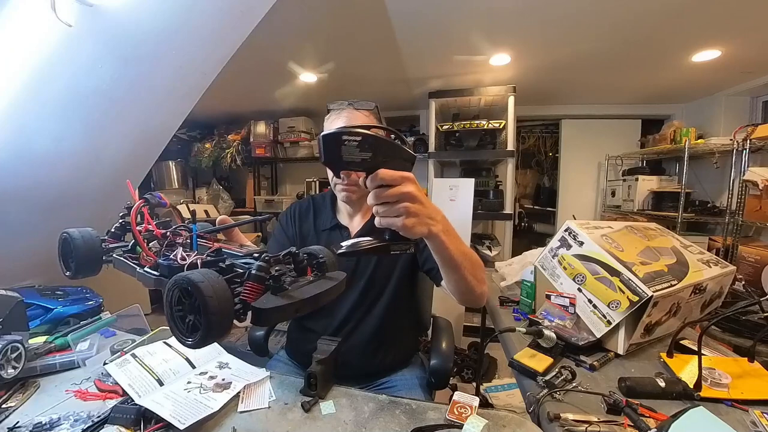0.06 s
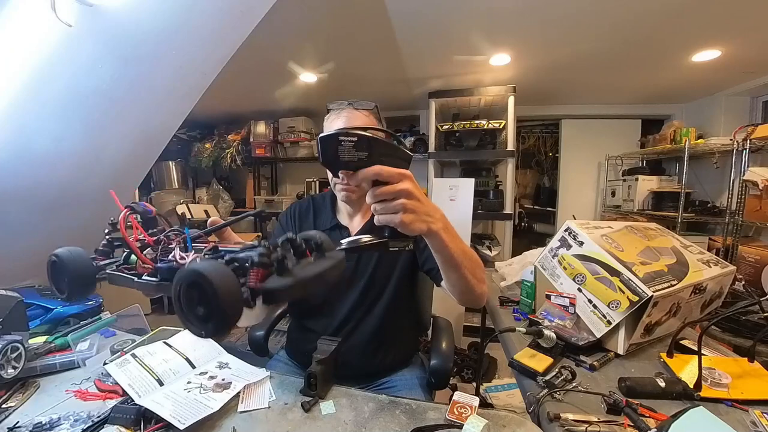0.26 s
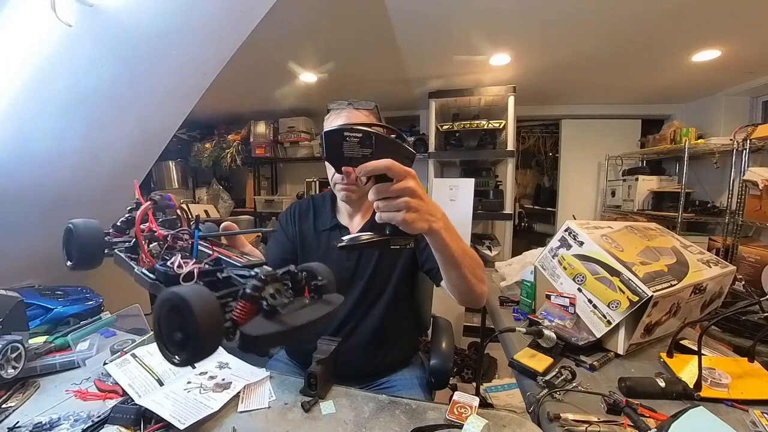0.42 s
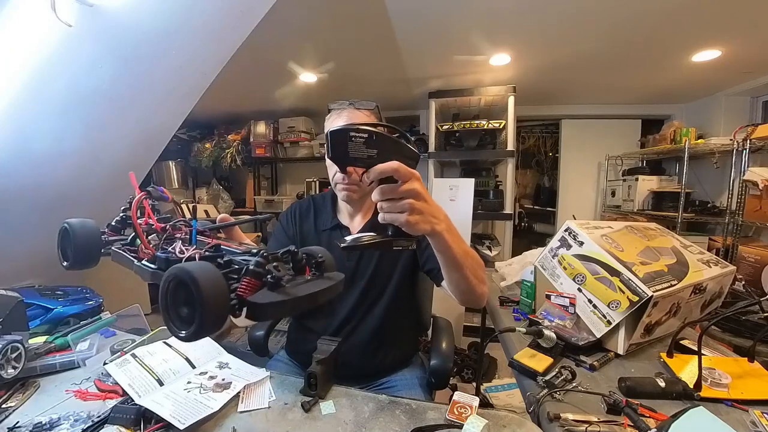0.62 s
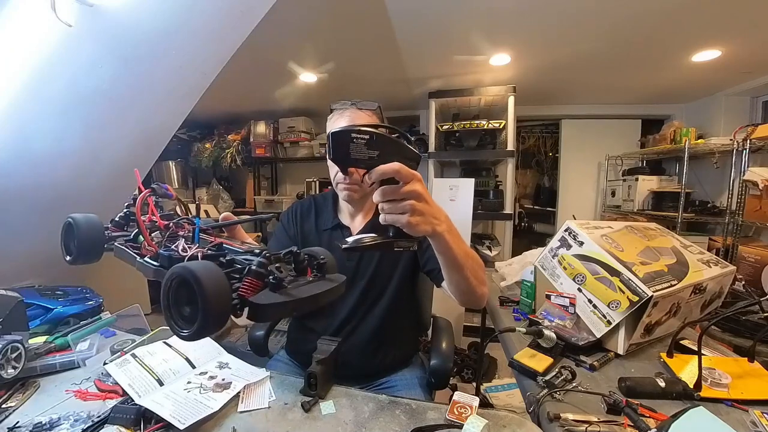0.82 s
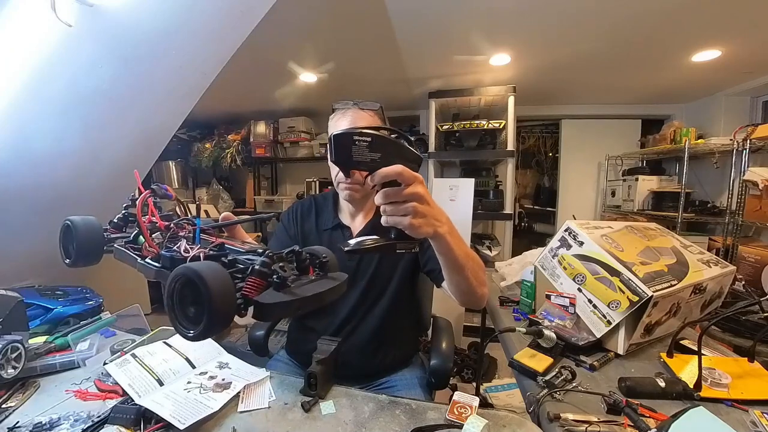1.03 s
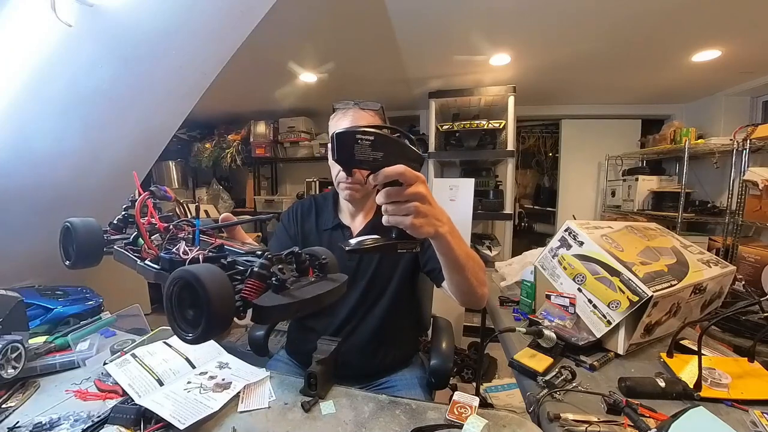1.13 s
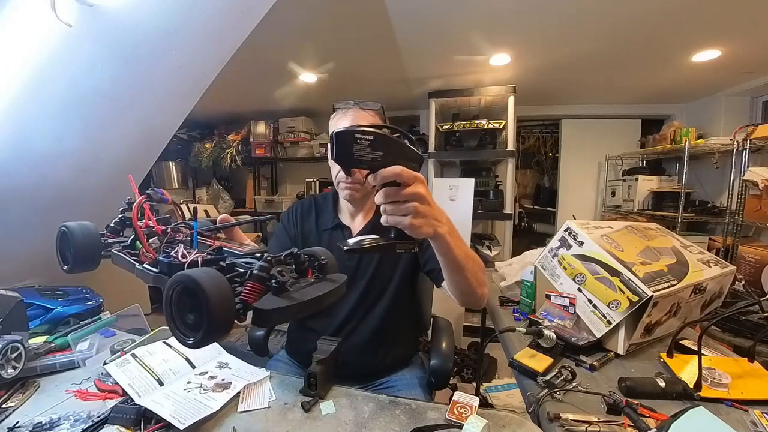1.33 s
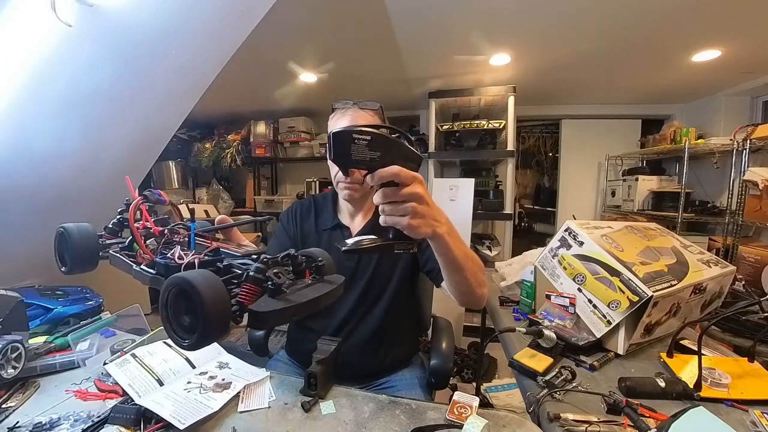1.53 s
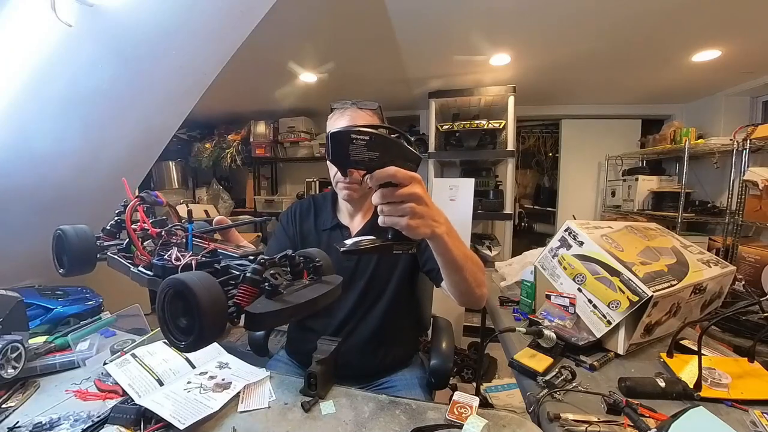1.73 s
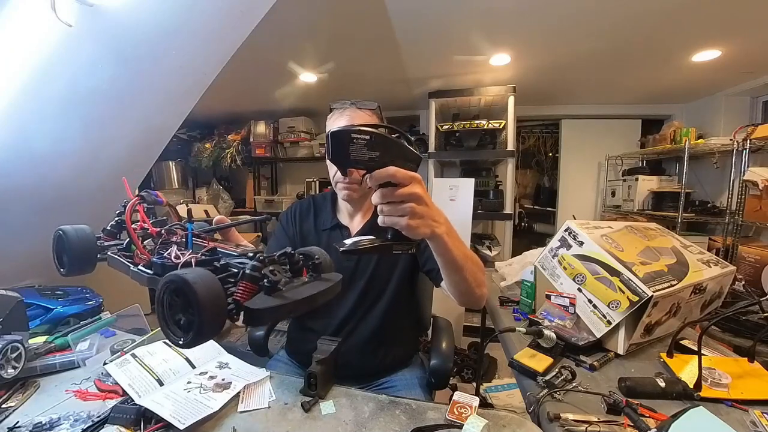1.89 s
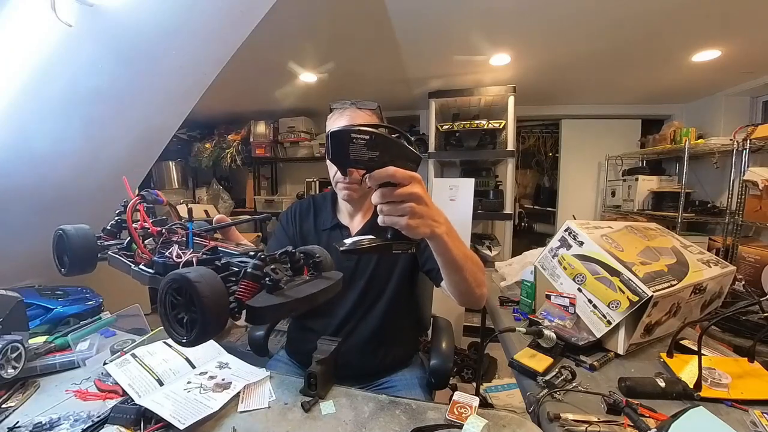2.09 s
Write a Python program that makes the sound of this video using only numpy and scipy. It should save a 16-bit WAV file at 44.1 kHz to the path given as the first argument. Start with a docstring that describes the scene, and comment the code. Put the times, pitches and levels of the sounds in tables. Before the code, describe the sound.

A small electric motor in a model car bites with a knock, screeches, then coasts down rattling

```python
"""In a workshop with low rumble and mains hum, a model car is held in the air while its cooling fan whines.
The electric motor stirs, then kicks in with a knock: random tooth contacts hiss and ring the chassis, the car
shakes and jolts, and rough squeals glide. Then the drivetrain coasts, teeth singing and rattling louder once a
turn of the slightly eccentric axle gear, while a lower grind comes forward; at the halt the slack knocks.
Filtered noise makes hiss, chassis, fan air and room; sines make blade tones, tooth tones, squeals and jolts."""
import sys
import numpy as np
from scipy import signal
from scipy.fft import rfft, irfft, next_fast_len
from scipy.io import wavfile
from scipy.ndimage import uniform_filter1d, map_coordinates

SR = 44100
rng = np.random.default_rng(int(sys.argv[2]) if len(sys.argv) > 2 else 0)


def to_wav(s):
    """Save 16-bit WAV."""
    ch = np.atleast_2d(s).T  # columns
    pcm = np.round(np.clip(ch, -1, 1) * 32767)  # PCM
    wavfile.write(sys.argv[1], SR, pcm.astype(np.int16))


N = 94815
T = np.arange(N) / SR  # s

START_S, POWER_END_S = .2412, 0.517  # the motor bites; the motor lets go
COAST_S, COAST_RPS = .55, 52.63  # axle speed [turns/s] at this time [s]
SWELL_DB = 3.1  # gears' level change per unit of swell
RING_DB = -5.5  # added to the level of every ring

# How the gears colour a contact: (frequency [Hz], density [dB per Hz])
GEAR_SPECTRUM = [(880, -37.5), (1500, -4.5), (2150, -7.5), (2440, -4), (3250, 0), (3540, 1.5), (5400, 3.5),
                 (5890, 1.5), (7450, 6), (9890, -7), (15500, -42)]
# Ringing of the gears: (frequency [Hz], width [Hz], level before RING_DB [dB])
GEAR_RESONANCES = [(2451, 82, 9), (3153, 200, 4), (3867, 68, 1.5), (4426, 236, -2.5), (5334, 158, 1),
                   (7220, 69, -3.5), (7670, 120, -6.5)]
# How the plastic chassis colours a contact: (frequency [Hz], density [dB per Hz])
CHASSIS_SPECTRUM = [(88, -31), (150, -28.5), (309, -13.5), (534, -7.5), (688, 2), (810, -7), (963, 4.5),
                    (1360, -0.5), (1700, -20), (2210, -9.5), (3740, -120)]
# Ringing of the chassis: (frequency [Hz], width [Hz], level before RING_DB [dB])
CHASSIS_RESONANCES = [(650, 110, -8.5), (890, 78, 3.5), (1336, 208, 7)]
# A thin metal ring heard with grind and knocks: (frequency [Hz], density [dB per Hz])
THIN_RING_SPECTRUM = [(10400, -38), (10950, -17), (11080, 2), (11200, -36), (11800, -45)]


def amp(db):
    """Amplitude factor of a level in dB."""
    return 10 ** (np.asarray(db) / 20)


def unit(x):
    """x scaled to an rms of 1."""
    return x / np.sqrt(np.mean(x ** 2) + 1e-20)


def along(points, hz):
    """Read (Hz, value) points on a log frequency axis."""
    f, v = np.transpose(points)
    return np.interp(np.log(hz + 1), np.log(f + 1), v)


def wobble(rate):
    """A smooth random curve through this many knots a second."""
    return map_coordinates(rng.standard_normal(int(N * rate / SR) + 4), [T * rate])


def coloured(x, spectrum, rings=()):
    """x through a causal minimum-phase filter with this spectrum and rings; white noise keeps its rms."""
    size = 2 ** 13
    hz = np.fft.rfftfreq(size, 1 / SR)
    gain = amp(np.maximum(along(spectrum, hz), -70))
    gain = gain * (1 + sum(amp(RING_DB + db) / (1 + (2 * (hz - c) / w) ** 2) for c, w, db in rings))
    # Folding the cepstrum forward in time gives the minimum phase
    ceps = irfft(np.log(gain))
    ceps[1:size // 2] *= 2
    ceps[size // 2 + 1:] = 0
    ir = irfft(np.exp(rfft(ceps)))
    return signal.fftconvolve(x, ir / np.linalg.norm(ir))[:N]


def fan():
    """Blades chop the air into harmonics of the blade rate, over the noise of the moved air."""
    # Blade tone, which sags with the battery: (time [s], frequency [Hz])
    blade_hz = [(0, 1380), (.24, 1380), (.4, 1240), (2.15, 1263)]
    # Blade harmonics: (multiple, level until the motor lets go [dB], level after [dB])
    blade_orders = [(1, -52, -52), (2, -61, -55.5), (3, -58, -66), (4, -70, -58), (5, -70, -76),
                    (6, -80, -68)]
    # Air noise: (frequency [Hz], density [dB per Hz])
    air_spectrum = [(150, -19), (300, -2.5), (420, -2), (520, -14), (650, -0.5), (1300, -10.5), (1700, -6),
                    (2900, -2), (3700, -4), (4400, -0.5), (5900, -11), (7500, -3), (9400, -14.5),
                    (10000, -49), (12000, -85)]
    air_db = -51.5
    hz = np.interp(T, *np.transpose(blade_hz)) + 0.61 * wobble(8.85)
    phase = 2 * np.pi * np.cumsum(hz) / SR
    late = T > POWER_END_S
    tones = 0
    for k, db, late_db in blade_orders:
        gain = amp(np.where(late, late_db, db) + 0.53 * wobble(53))
        tones = tones + np.sqrt(2) * gain * np.sin(k * phase)
    air = coloured(rng.standard_normal(N), air_spectrum)
    return tones + amp(air_db + 0.32 * wobble(4)) * air


def workshop():
    """The place itself: a low rumble as filtered noise, and mains hum as one unsteady sine."""
    # Rumble colour: (frequency [Hz], density [dB per Hz])
    rumble_spectrum = [(15, -20), (25, -15), (59, 0.5), (91, -15.5), (113, -1.5), (146, -14), (220, -24.5),
                       (290, -62), (480, -120)]
    # Rumble over time: (time [s], level [dB])
    rumble_db = [(0.0, -67), (0.05, -54), (0.34, -66), (0.77, -65.5), (0.78, -59.5), (1.99, -56.5),
                 (2.04, -49.5), (2.15, -55)]
    hum_hz, hum_db = 120.2, -65.5
    hum = np.sqrt(2) * amp(hum_db + 3.3 * wobble(8.36)) * np.sin(2 * np.pi * hum_hz * T)
    rumble_gain = amp(np.interp(T, *np.transpose(rumble_db)) + 2.5 * wobble(5.6))
    return hum + rumble_gain * coloured(rng.standard_normal(N), rumble_spectrum)


def rattle():
    """Dense random contacts of uneven size, at an rms of 1."""
    contacts_per_s, scatter_db = 25000, 1
    hit = rng.random(N) < contacts_per_s / SR
    return unit(hit * rng.standard_normal(N) * amp(scatter_db * rng.standard_normal(N)))


def patchy(x):
    """Random patches of gain a few hundred Hz wide and a few tens of ms long."""
    patch_db = 1.5
    z = signal.stft(x, nperseg=256)[2]
    field = uniform_filter1d(rng.standard_normal(z.shape), size=3, axis=0)
    field = uniform_filter1d(field, size=8, axis=1)
    gain = amp(patch_db * unit(field))
    return signal.istft(z * gain / np.sqrt(np.mean(gain ** 2)), nperseg=256)[1][:N]


def level(column):
    """Base level in dB of the gears (column 1) or chassis (column 2): creeping, then driven and coasting."""
    # The motor stirs before it bites: (time [s], gear hiss level [dB], chassis level [dB])
    creep_db = [(.19, -64, -67), (.2, -53, -50), (.222, -51, -45), (.226, -36, -42), (.24, -58, -50)]
    # From the bite to the halt: (time [s], gear hiss level [dB], chassis level [dB])
    drive_db = [(.243, -24, -22), (0.286, -18.5, -23), (.311, -18, -39.5), (0.382, -20, -30.5),
                (.407, -25, -36), (.459, -20.5, -30.5), (.495, -25, -33), (.555, -30, -43),
                (.6, -26.5, -36), (.72, -24.5, -35), (.9, -23.5, -29.5), (1.04, -22.5, -32.5),
                (1.08, -25.5, -35.5), (1.13, -22, -29.5), (1.36, -25.5, -31), (1.64, -33, -33.5),
                (1.8, -38.5, -34.5), (1.95, -47, -40.5), (2.01, -51.5, -43.5), (2.03, -56.5, -54),
                (2.118, -53, -43), (2.13, -77, -59)]
    creep, drive = np.transpose(creep_db), np.transpose(drive_db)
    creeping = np.interp(T, creep[0], creep[column], left=-120)
    return np.where(T < START_S, creeping, np.interp(T, drive[0], drive[column]))


def coasting():
    """0 under power, rising to 1 once the motor lets go."""
    return np.clip((T - POWER_END_S) / 0.044, 0, 1)


def axle_turns():
    """Turns of the coasting axle: friction slows it, ever more gently."""
    brake, ease = 56.29, 16.62  # turns/s^2, turns/s^3
    u = T - COAST_S
    return COAST_RPS * u - brake * u ** 2 / 2 + ease * u ** 3 / 3


def eccentric_swell(turns):
    """The eccentric axle gear meshes tightest once a turn; the swell evens out as the gears slow."""
    high_spot = .08  # share of a turn where the mesh is tightest
    overtone = .3  # share of the second harmonic, which sharpens the peak
    end_s, fade_s = 1.9, .95
    angle = 2 * np.pi * (turns - high_spot)
    shape = (np.cos(angle) + overtone * np.cos(2 * angle)) / (1 + overtone / 2)
    return shape * coasting() * np.clip((end_s - T) / fade_s, 0, 1)


def gear_hiss(swell):
    """Tooth contacts ring the gears, unevenly while coasting."""
    uneven_db = .8
    db = SWELL_DB * swell + uneven_db * coasting() * wobble(39.96) + level(1)
    return coloured(patchy(rattle()) * amp(db), GEAR_SPECTRUM, GEAR_RESONANCES)


def chassis(swell):
    """Tooth contacts ring the plastic chassis, which follows the swell less than the gears do."""
    swell_db = 1.5  # per unit of swell
    db = swell_db * swell + 0.54 * wobble(34.7) + level(2)
    return coloured(rattle() * amp(db), CHASSIS_SPECTRUM, CHASSIS_RESONANCES)


def shake():
    """The lower chassis rattles as the torque twists the car."""
    # Colour: (frequency [Hz], density [dB per Hz])
    shake_spectrum = [(120, -23), (250, -13.5), (400, -3.5), (600, 2.5), (750, -3), (900, -44)]
    # Strength, silent outside these times: (time [s], level [dB])
    shake_db = [(0.19, -51), (0.206, -48), (0.23, -59), (0.24, -40), (0.262, -36), (0.29, -45),
                (0.494, -38), (0.538, -61), (0.56, -60)]
    db = np.interp(T, *np.transpose(shake_db), left=-120, right=-120)
    return coloured(rattle() * amp(db + 0.91 * wobble(61)), shake_spectrum)


def grind(swell):
    """Lower contacts come forward against the hiss as the gears slow, with a flickering thin metal ring."""
    # Colour: (frequency [Hz], density [dB per Hz])
    grind_spectrum = [(1300, -26.5), (1800, -4), (2500, -7.5), (3200, -1.5), (4200, -1), (6000, -44)]
    grind_db, grows_db_per_s = -20, 14  # against the gear hiss at COAST_S; its growth
    ring_db, flicker_db = -30, 6  # thin ring against the grind; its random wander
    db = level(1) + grind_db + grows_db_per_s * (T - COAST_S) + SWELL_DB * swell
    slow = patchy(rattle()) * amp(db)
    thin = slow * amp(ring_db + flicker_db * wobble(24.4))
    return coloured(slow, grind_spectrum, GEAR_RESONANCES) + coloured(thin, THIN_RING_SPECTRUM)


def knocks():
    """Slack in the drivetrain is taken up: a blow and its dying chatter into chassis and gears."""
    # Knocks: (time [s], chassis blow level [dB], gears against chassis [dB])
    blows = [(0.2411, -8.5, 0.5), (0.2467, -7, 4), (.487, -14.5, -12), (1.959, -20.5, -7),
             (2.0517, -17.5, -6.5), (2.064, -24.5, -20), (2.0856, -15.5, -8.5), (2.095, -17, -22),
             (2.106, -20, -16), (2.114, -19, -28)]
    chatter_db, t60_s = -11.5, 0.021  # chatter against the blow; time to fall 60 dB
    low, high = np.zeros(N), np.zeros(N)
    for s, db, treble_db in blows:
        decay_db = chatter_db - 60 * np.maximum(T - s, 0) / t60_s
        hit = (T >= s) * amp(decay_db) * rng.standard_normal(N)
        hit[round(s * SR)] = 1
        low += hit * amp(db)
        high += hit * amp(db + treble_db)
    body = coloured(low, CHASSIS_SPECTRUM, CHASSIS_RESONANCES)
    gears = coloured(high, GEAR_SPECTRUM, GEAR_RESONANCES)
    return body + gears + amp(-18) * coloured(high, THIN_RING_SPECTRUM)


def power_fizz():
    """Extra treble contacts while the motor pulls."""
    # Colour: (frequency [Hz], density [dB per Hz])
    fizz_spectrum = [(5000, -28.5), (6500, -2), (8700, 1), (10500, -21), (13500, -24), (15500, -40)]
    fizz_db = -6  # against the gear hiss
    power = (T >= START_S) * (1 - coasting())
    return coloured(rattle() * power * amp(level(1) + fizz_db), fizz_spectrum)


def squeals():
    """Brief gliding tones while the motor pulls, roughened by random level and phase."""
    # Glides: (centre time [s], length [s], from [Hz], to [Hz], level [dB])
    glides = [(0.285, 0.019, 5860, 6140, -23.5), (0.341, 0.019, 6480, 6680, -22.5),
              (0.355, 0.012, 7140, 7180, -20), (0.378, 0.021, 4400, 4680, -21.5),
              (0.447, 0.011, 4330, 4330, -29)]
    out = 0
    for s, length, hz0, hz1, db in glides:
        u = (T - s) / length
        phase = 2 * np.pi * length * ((hz0 + hz1) / 2 * u + (hz1 - hz0) / 2 * u ** 2)
        envelope = amp(db + 3 * wobble(400)) * np.exp(-4 * u ** 2)
        out = out + envelope * np.sqrt(2) * np.sin(phase + wobble(250))
    return out


def thumps():
    """The car jolts in the hand: low sines that swell and die softly."""
    # Jolts: (time [s], frequency [Hz], level at the envelope's peak [dB])
    jolts = [(0.348, 442, -31), (0.369, 142, -38.5), (0.483, 300, -42), (0.528, 173, -46)]
    rise_s = 0.0042
    out = 0
    for s, hz, db in jolts:
        v = np.maximum(T - s, 0) / rise_s
        out = out + amp(db) * np.e * v * np.exp(-v) * np.sin(2 * np.pi * hz * rise_s * v)
    return out


def teeth(turns, swell):
    """Harmonics of the tooth rate flare near the tight spot and where they cross a resonance."""
    # Harmonics of the tooth rate: (multiple, level [dB])
    mesh_orders = [(2, 0), (3, -2), (4, -4), (5, -7)]
    # Resonances the tones cross: (frequency [Hz], width [Hz], level [dB])
    sing_resonances = [(2480, 220, -7), (3280, 240, -6), (3800, 200, -6), (4350, 250, -6), (5400, 550, -1),
                       (7250, 600, -3)]
    tooth_count, waver = 37, .012  # waver: random share of the tooth rate at COAST_S
    tooth_db, swell_db, scatter_db = -1.5, 12, 3  # against the gear hiss; per unit of swell; random wander
    end_s, fade_s = 1.5, 0.56
    cycles = tooth_count * turns + np.cumsum(waver * tooth_count * COAST_RPS * wobble(60)) / SR
    hz = np.gradient(cycles) * SR
    tones = 0
    for k, db in mesh_orders:
        gain = sum(amp(top_db) / (1 + (2 * (k * hz - c) / w) ** 2) for c, w, top_db in sing_resonances)
        tone = np.sin(2 * np.pi * (k * cycles + rng.random()))
        tones = tones + gain * amp(db + scatter_db * wobble(51.8)) * tone
    fade = np.clip((end_s - T) / fade_s, 0, 1) * (T > POWER_END_S)
    return tones * amp(swell_db * (swell - 0.5) + tooth_db + level(1)) * fade


def drivetrain():
    """Contacts drive gears and chassis, all swelling with one axle; teeth and squeals sing on top."""
    turns = axle_turns()
    swell = eccentric_swell(turns)
    contacts = gear_hiss(swell) + chassis(swell) + shake() + grind(swell) + power_fizz()
    return contacts + squeals() + teeth(turns, swell)


def room(x):
    """Each frequency of the room's answer dies at its own speed; the answer changes as the car moves."""
    # Decay: (frequency [Hz], time to fall 60 dB [s])
    decay_s = [(300, 0.83), (3000, 0.61), (10000, 0.38)]
    hz, t, z = signal.stft(rng.standard_normal((12, SR // 2)), SR, nperseg=256)
    tails = signal.istft(z * amp(-60 * t / along(decay_s, hz)[:, None]), SR, nperseg=256)[1]
    # Crossfade through the twelve answers in turn
    place = np.linspace(0, len(tails) - 1, N)
    parts = x * np.cos(np.pi / 2 * np.clip(place - np.arange(len(tails))[:, None], -1, 1))
    delayed = np.pad(parts, ((0, 0), (180, 0)))  # samples before the first reflection
    return signal.fftconvolve(delayed, tails / np.linalg.norm(tails[0]), axes=1)[:, :N].sum(0)


def scene():
    """The car, direct and through the room, with its fan and the workshop around it."""
    room_db = -10.5
    car = drivetrain() + knocks() + thumps()
    return (car + amp(room_db) * room(car) + fan() + workshop())[None]


def record(dry):
    """The microphone channel keeps nothing from its band limit up."""
    top_hz = 15500
    size = next_fast_len(N + SR // 2)
    kept = np.fft.rfftfreq(size, 1 / SR) < top_hz
    return irfft(rfft(dry, size) * kept, size)[:, :N]


dry = scene()
out = record(dry)
to_wav(out)
```